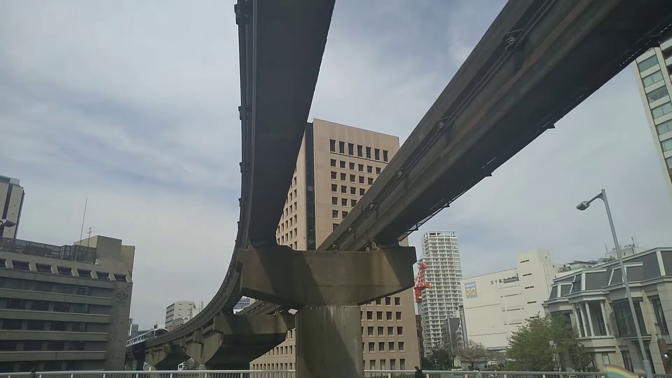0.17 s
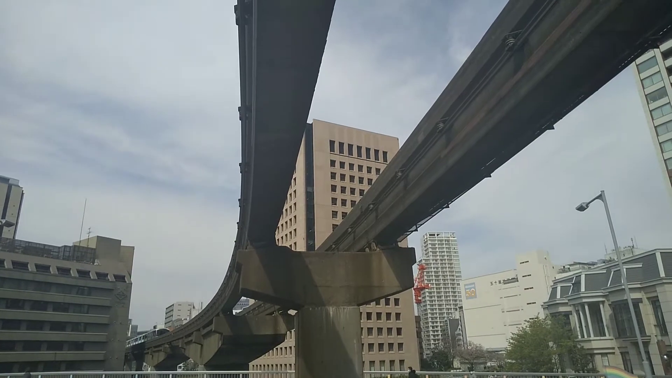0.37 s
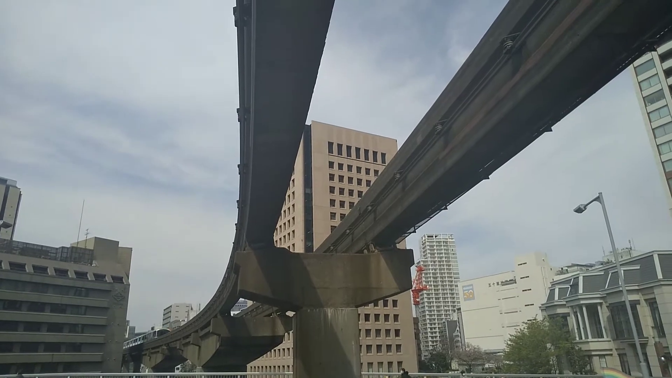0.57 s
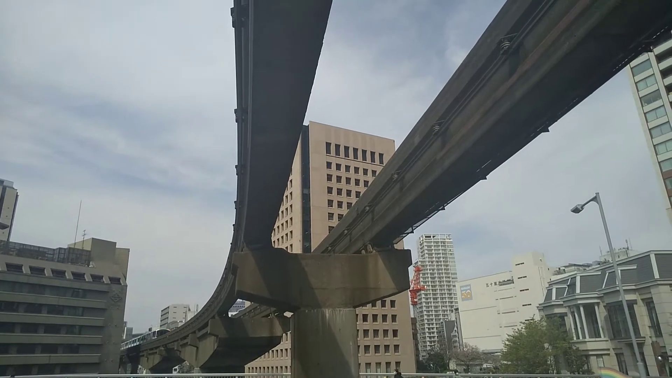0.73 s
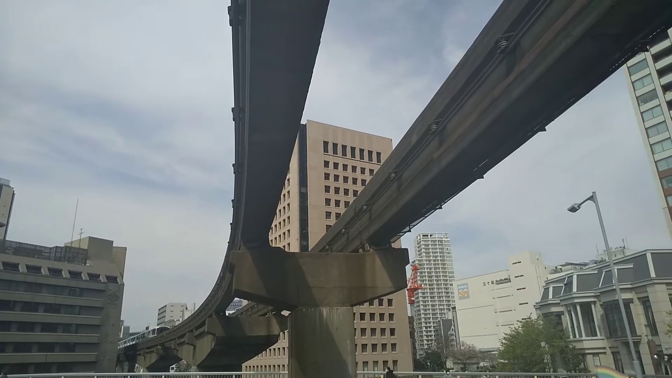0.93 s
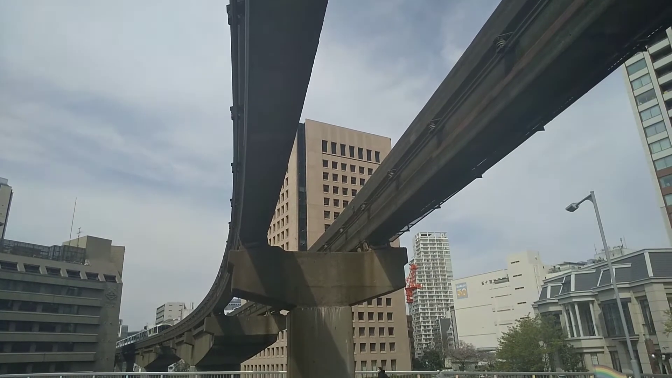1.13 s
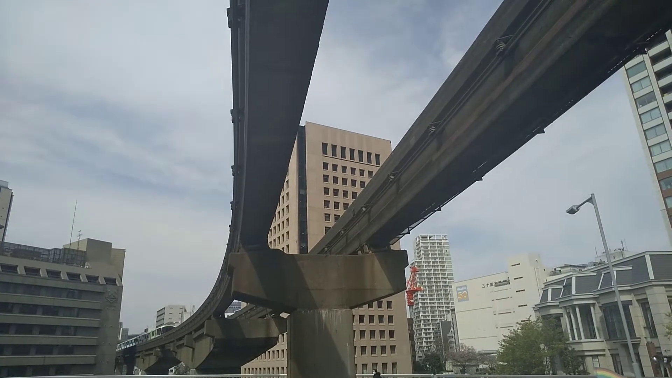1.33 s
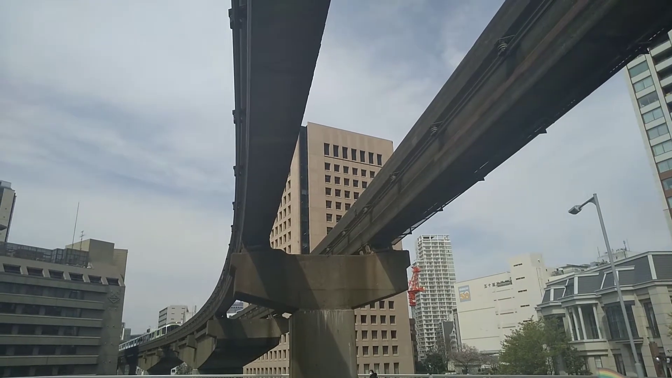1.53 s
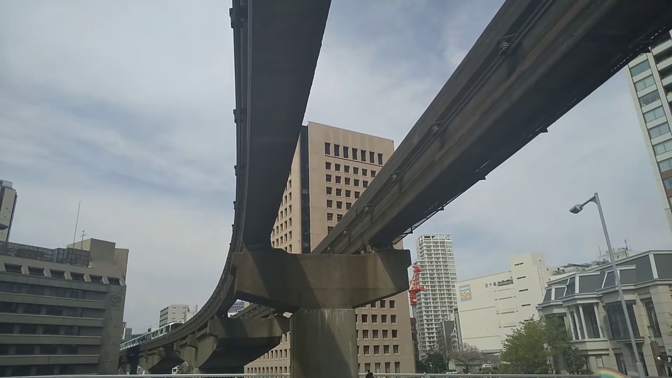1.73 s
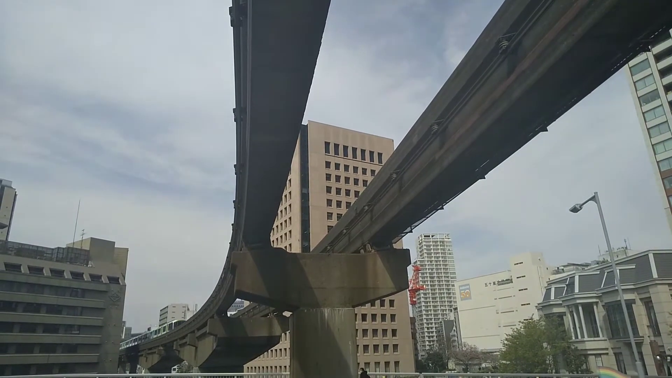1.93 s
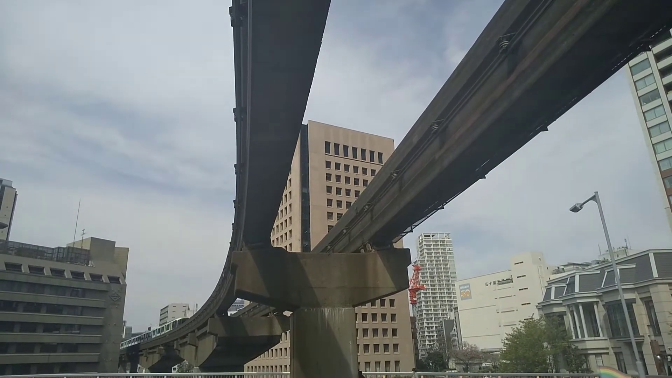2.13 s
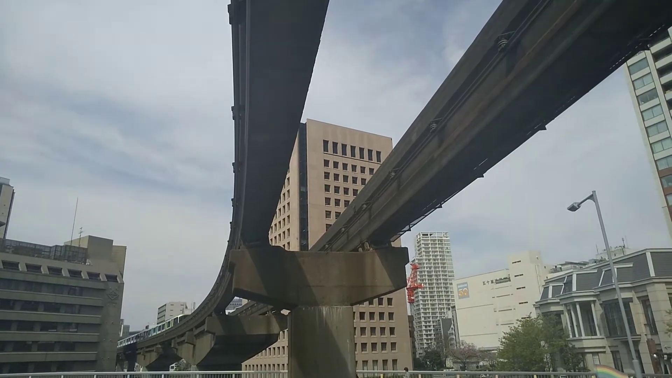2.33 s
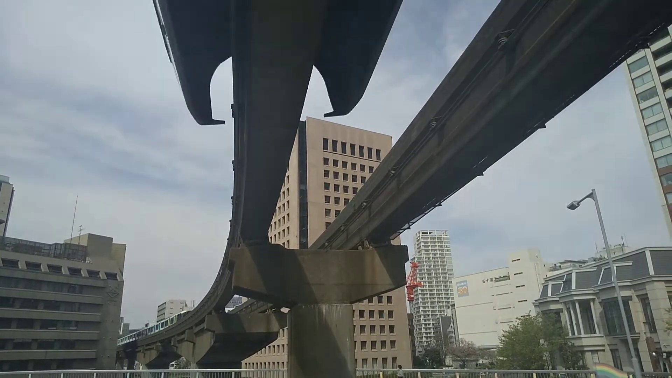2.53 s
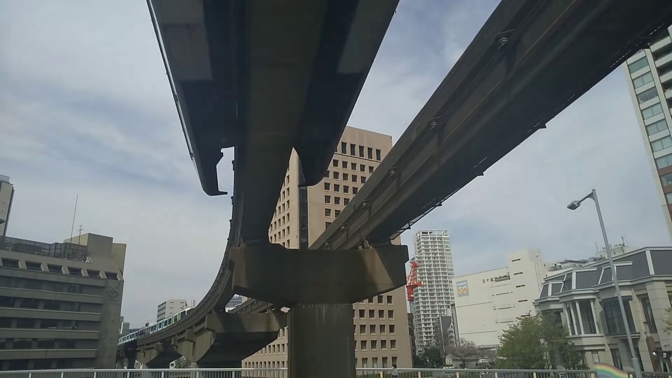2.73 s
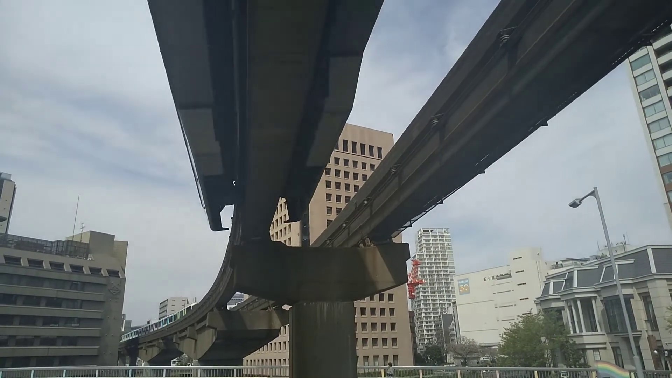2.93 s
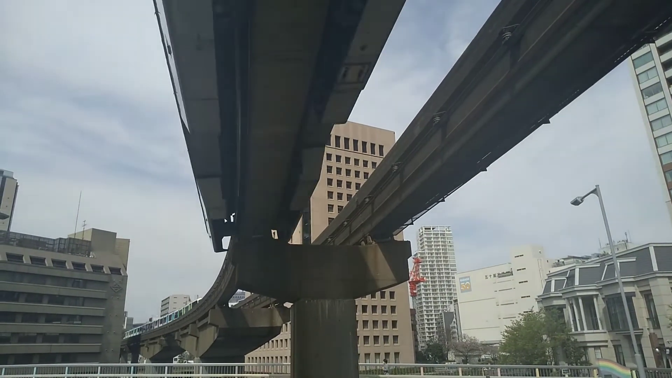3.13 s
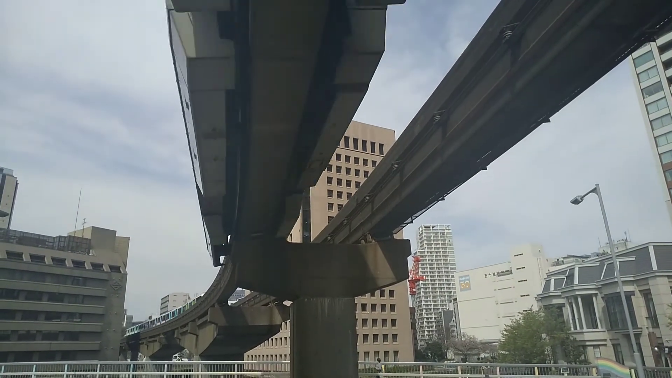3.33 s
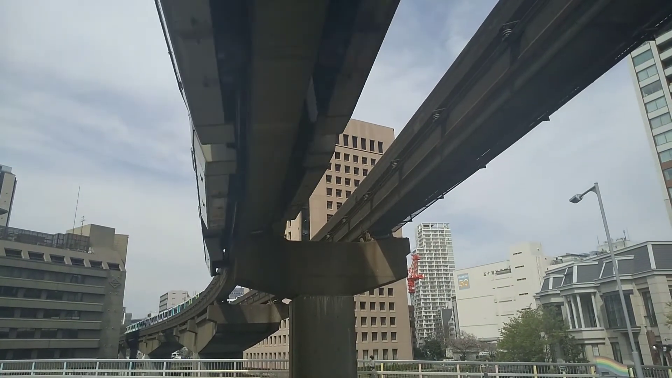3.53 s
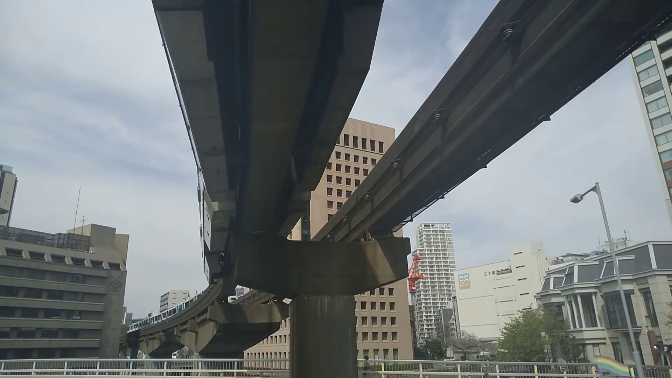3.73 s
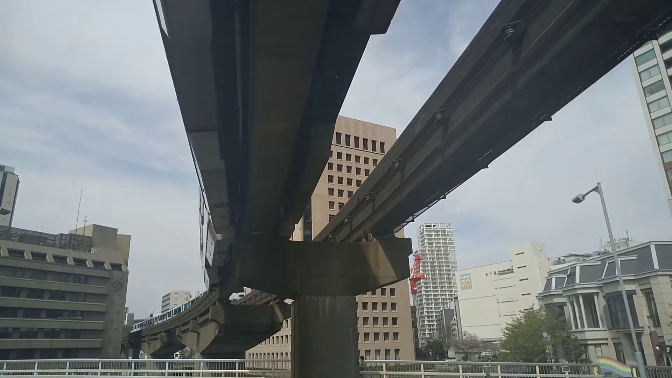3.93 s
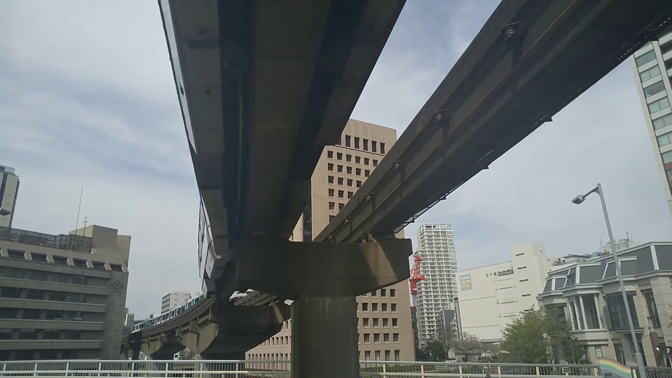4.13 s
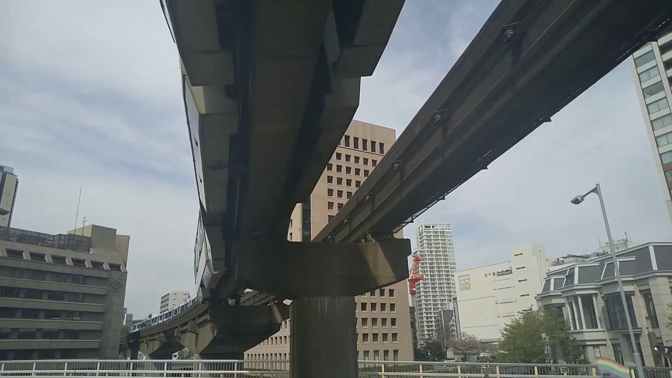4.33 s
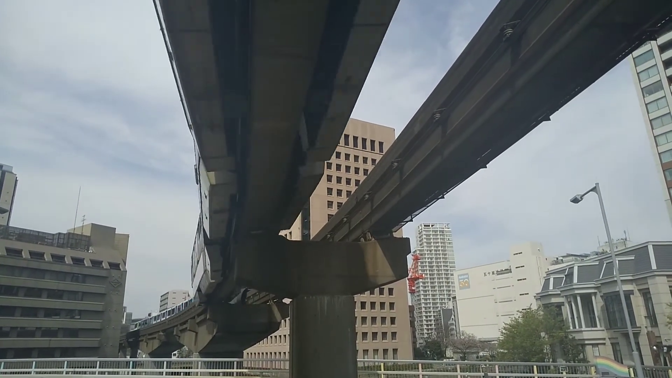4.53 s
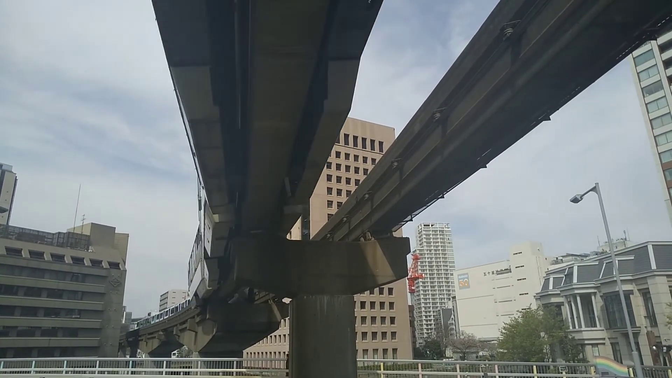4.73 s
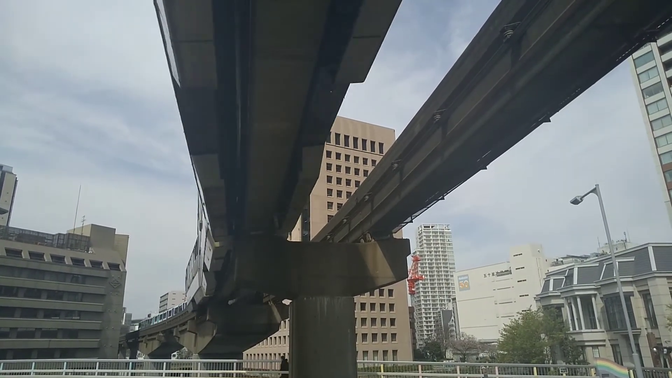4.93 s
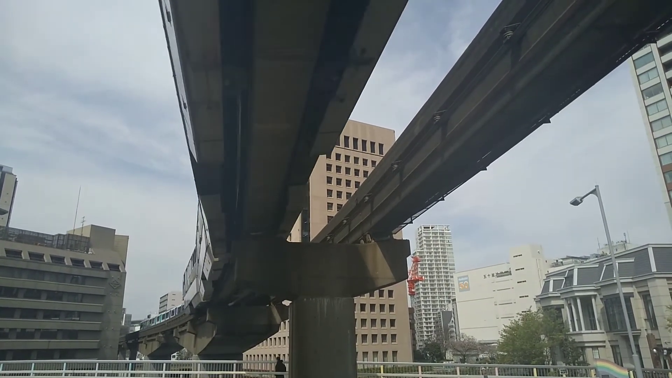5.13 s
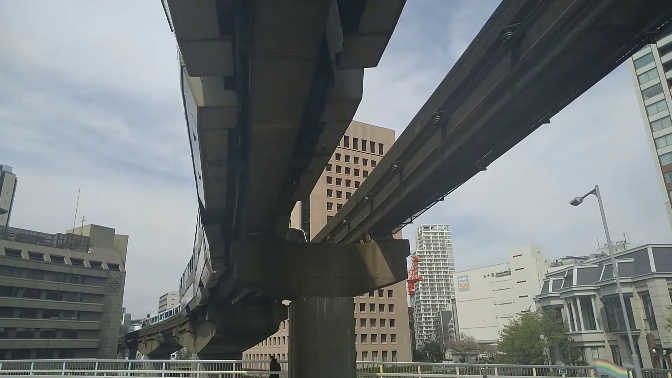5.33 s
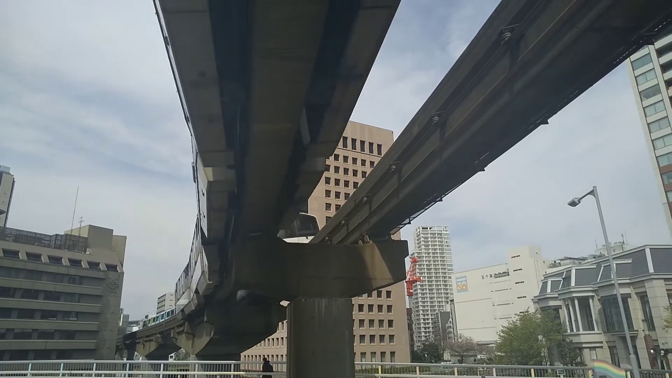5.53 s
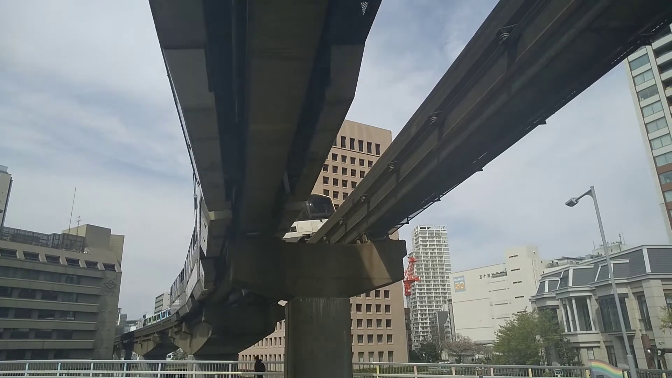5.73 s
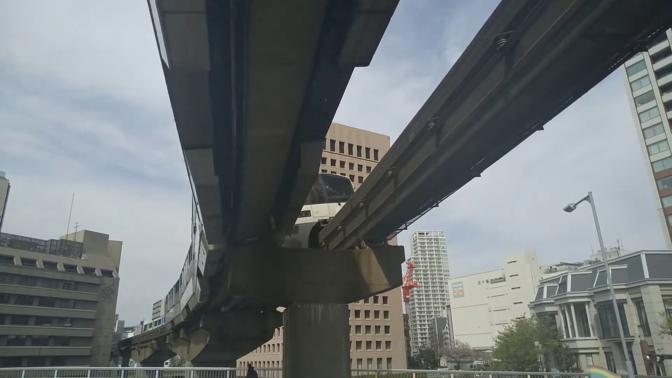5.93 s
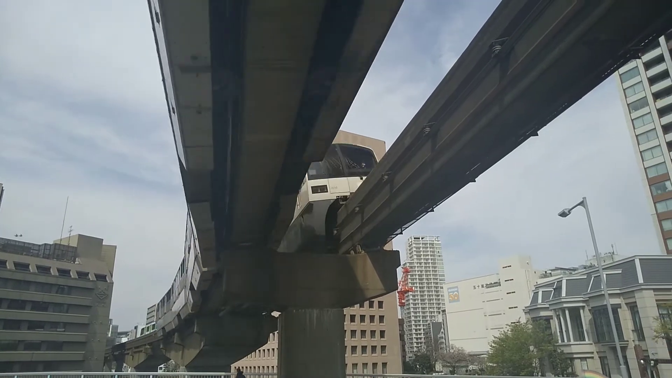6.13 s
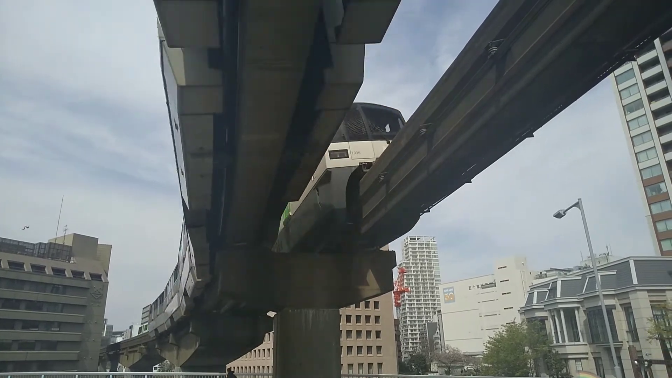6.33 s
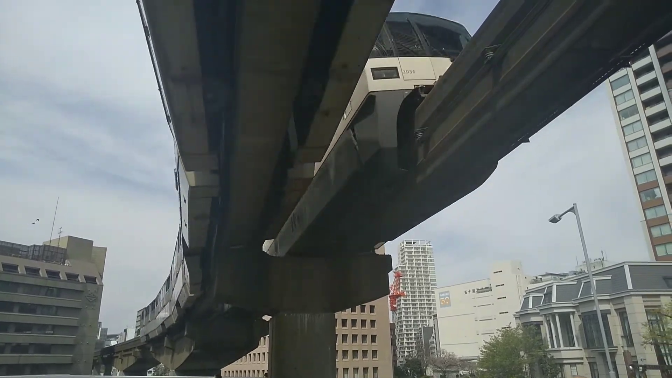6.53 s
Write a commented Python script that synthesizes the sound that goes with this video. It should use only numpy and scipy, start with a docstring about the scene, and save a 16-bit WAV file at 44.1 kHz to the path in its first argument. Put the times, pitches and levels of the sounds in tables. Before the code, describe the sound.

A monorail train passes overhead, heard in mono from a city street about eight metres below its concrete beam, with a faint, even wash of distant traffic. For the first two seconds it approaches: a low hum and tyre rush grow, with soft booms about every half second. At about 2 seconds a deep thud and a sharp slap mark the wheels reaching the span above, and the sound turns loud. Around 2.5 seconds the power contacts add a high, scraping, slightly ringing hiss, with one tiny, thin whistle. From 3 seconds the rubber tyres roar fully over a throbbing drone, and the beam booms with each wheel set, roughly twice a second. Quick, irregular double clacks over joints are thickest between 3 and 4.5 seconds. Rumble, clacks and surging hiss continue until the end, near 6.7 seconds, with the train still overhead.

```python
"""Monorail overhead, from the street

One microphone on a city road, about 8 m below a concrete beam, with distant traffic behind.
A rubber-tyred train nears and passes above: its tyres roar, slap over joints and set the beam
booming at its low modes, swelling with each set of wheels. Once the cars are overhead,
the current shoes hiss along the power rail."""
import sys
import numpy as np
from scipy import signal
from scipy.fft import rfft, irfft
from scipy.io import wavfile
from scipy.ndimage import uniform_filter1d, minimum_filter1d

SR = 44100
rng = np.random.default_rng(int(sys.argv[2]) if len(sys.argv) > 2 else 0)


def store_wav(level_fs):
    """Save 16-bit WAV to argv[1]."""
    pcm = np.round(np.clip(np.atleast_2d(level_fs), -1, 1) * 32767)
    wavfile.write(sys.argv[1], SR, pcm.T.astype(np.int16))


N = 295029
TIME = np.arange(N) / SR
ARRIVAL_S, SPEED_M_PER_S, HEIGHT_M = 2.154, 17.7, 7.9  # the nose comes over the microphone
SPAN_S, CROSSING_S = 1.96, 0.018  # the leading wheels cross onto the span overhead
SHOES_SEEN_S, UNCOVER_S = 2.355, 0.14  # the shoes come out from behind the beam


def gain_of(db):
    """Decibels to amplitude."""
    return 10 ** (np.asarray(db) / 20)


def unit_rms(x):
    """Scales to rms 1."""
    return x / np.sqrt(np.mean(x ** 2) + 1e-20)


def add(mix, start_s, sound):
    """Mixes a sound in at start_s."""
    part = mix[round(start_s * SR):][:len(sound)]
    part += sound[:len(part)]


def before(end_s, fade_s):
    """Fades smoothly from 1 to 0 around end_s."""
    return .5 - .5 * np.tanh((TIME - end_s) / fade_s)


def bell(centre_s, half_length_s):
    """A bell-shaped rise and fall of height 1."""
    return np.exp(-((TIME - centre_s) / half_length_s) ** 2)


def swells(passes):
    """A swell in dB for each thing passing the microphone; one curve per dB column."""
    return sum(np.outer(dbs, bell(centre_s, half_s)) for centre_s, half_s, *dbs in passes)


def wander(rate_hz):
    """Random drift of rms 1, up to about rate_hz."""
    hz = np.fft.rfftfreq(N, 1 / SR)
    return unit_rms(irfft(rfft(rng.standard_normal(N)) / (1 + (hz / rate_hz) ** 4), N))


def ringing_noise(hz, width_hz):
    """Noise of rms 1, passed twice through a resonance at a steady or moving pitch."""
    carrier = np.exp(2j * np.pi * np.cumsum(hz * np.ones(N)) / SR)
    pole = np.exp(-np.pi * width_hz / SR)
    ring = rng.standard_normal(N)
    for _ in range(2):
        ring = (carrier * signal.lfilter([1 - pole], [1, -pole], ring / carrier)).real
    return unit_rms(ring)


def noise(spectrum, patchy_db):
    """Noise of rms 1 with a given spectrum, its level drifting in patches of time and frequency."""
    frames = signal.stft(rng.standard_normal(N), nperseg=512, noverlap=384)[2]
    patches = uniform_filter1d(rng.standard_normal(frames.shape), size=7, axis=0)
    patches = unit_rms(uniform_filter1d(patches, size=12, axis=1))
    patchy = signal.istft(frames * gain_of(patchy_db * patches), nperseg=512, noverlap=384)[1][:N]
    hz, db = np.transpose(spectrum)
    log_hz = np.log(np.fft.rfftfreq(N, 1 / SR) + 1)
    colour_db = np.interp(log_hz, np.log(hz), db, left=-90, right=-90)
    return unit_rms(irfft(rfft(patchy) * gain_of(colour_db), N))


def drone(hz, waver_hz, throb_db):
    """One tone of the beam, rms 1, kept going by the rolling wheels; its pitch and level waver."""
    turns = np.cumsum(hz + waver_hz * wander(rate_hz=12.2)) / SR
    throb = gain_of(throb_db * wander(rate_hz=8.2))
    return unit_rms(throb * np.sin(2 * np.pi * turns))


def nearness_db():
    """Spreading loss from the train's nose to the microphone; stays at 0 dB once cars are above."""
    ahead_m = SPEED_M_PER_S * np.maximum(ARRIVAL_S - TIME, 0)
    return 20 * np.log10(HEIGHT_M / np.hypot(HEIGHT_M, ahead_m))


def rolling_db(falloff, far_span_db):
    """Level of a rolling sound: grows with nearness, steps up as the wheels reach the span overhead."""
    return falloff * nearness_db() + far_span_db * before(SPAN_S, CROSSING_S)


def sliding_db(level_db, falloff, hidden_db=-7.5):
    """Level of a shoe sound: grows with nearness, opens up once the beam no longer hides the shoes."""
    return level_db + falloff * nearness_db() + hidden_db * before(SHOES_SEEN_S, UNCOVER_S)


# Spectrum of far-off traffic at street level: frequency_hz, density_db
TRAFFIC_SPECTRUM = [(15, -24), (28, -14), (50, 0.5), (85, 1.5), (160, -7.5), (240, -4.5), (420, -13.5),
                    (680, -6), (950, -15.5), (1550, -16.5), (2300, -21.5), (3200, -34.5), (5000, -51),
                    (14000, -65)]
def traffic(level_db=-28.5):
    """The even wash of the road, far from the microphone."""
    return gain_of(level_db) * noise(TRAFFIC_SPECTRUM, patchy_db=1)


# Spectra of the shoes on the power rail, lowest band to highest: frequency_hz, density_db
SCRAPE_SPECTRUM = [(2200, -29), (3100, -4), (3600, 4), (4200, -1.5), (5200, -3.5), (5800, -2.5), (6700, -6),
                   (7800, -18.5), (10000, -20)]
HISS_SPECTRUM = [(6000, -13), (7000, -3.5), (7800, -6), (8600, 0.5), (9400, 1.5), (10400, -1), (11500, -14),
                 (14000, -22)]
SIZZLE_SPECTRUM = [(8500, -16), (10300, -3.5), (11200, -1.5), (12500, 0.5), (14300, -3)]
# Swells as shoes sweep over the microphone: centre_s, half_length_s, ring_db, hiss_db, sizzle_db
SHOE_SWELLS = [(2.51, .09, 3, 7.5, 8), (2.92, .22, 1, 1.5, 6), (3.38, 0.2, 1, 4.5, 4.5),
               (4.12, .05, 2, 3, 8), (4.34, .1, 4.5, 3.5, 4.5), (4.62, 0.081, 4, 1, 0),
               (4.88, .16, 2, 2, 3), (5.31, 0.077, 3.5, 3.5, 3), (6.06, .12, 2, 1, 6),
               (6.38, .17, 4.5, 2, 10), (6.65, 0.057, 5.5, 2.5, 1)]
def shoes(ring_hz=4360, ring_flutter_db=1.1, chatter_db=1.0):
    """Sliding contact scrapes, hisses and rings the shoe holders, more so as more cars come above."""
    ring_swell, hiss_swell, sizzle_swell = swells(SHOE_SWELLS)
    nose_only = before(3.28, fade_s=0.21)
    scrape_db = sliding_db(-46, falloff=1.1, hidden_db=-5.5) + 0.73 * hiss_swell - 2 * nose_only
    ring_db = sliding_db(-47.5, falloff=1.5) + ring_swell - 7 * nose_only
    hiss_db = sliding_db(-53.5, falloff=1.36) + hiss_swell
    sizzle_db = sliding_db(-57.5, falloff=1.5) + sizzle_swell
    chatter = gain_of(chatter_db * wander(rate_hz=28))
    holders = ringing_noise(ring_hz + 70 * wander(rate_hz=18), width_hz=750)
    holders *= gain_of(ring_db + ring_flutter_db * wander(rate_hz=24))
    scrape = gain_of(scrape_db) * noise(SCRAPE_SPECTRUM, patchy_db=2.5)
    hiss = gain_of(hiss_db) * noise(HISS_SPECTRUM, patchy_db=1.5)
    sizzle = gain_of(sizzle_db) * noise(SIZZLE_SPECTRUM, patchy_db=2.5)
    return chatter * (scrape + holders + hiss + sizzle)


def shoe_whistle(pitch_hz=10900, level_db=-52):
    """The leading shoe sings briefly as it sweeps overhead."""
    envelope = gain_of(level_db) * bell(centre_s=2.505, half_length_s=0.042)
    return envelope * ringing_noise(pitch_hz, width_hz=300)


# Bending modes of the concrete beam overhead: pitch_hz, width_hz, level_db
BEAM_MODES = [(57.76, 2.2, -6), (73.3, 10, -5), (94.9, 21, 4), (124, 12, -1.5), (139.2, 6.9, -4.5)]
# Path of the beam's upper tone, which drones on between booms: time_s, pitch_hz
UPPER_TONE_PITCH = [(1.9, 100), (2.33, 103.2), (3.51, 99.66), (3.85, 112.2), (4.06, 100.2), (4.23, 110.2),
                    (4.38, 100.5), (4.74, 110.5), (6.69, 109)]
def beam(rumble_db=-19.5, upper_db=-19, steadiness=0.45, hold_s=0.073):
    """A tone over the looser rumble of the beam's modes, loud once the span carries the train."""
    rumble = sum(gain_of(db) * ringing_noise(hz, 2 * width_hz) for hz, width_hz, db in BEAM_MODES)
    power = uniform_filter1d(rumble ** 2, int(hold_s * SR))
    rumble = unit_rms(rumble / (power + 1e-12) ** (steadiness / 2))  # the cars' weight keeps it going
    time_s, pitch_hz = np.transpose(UPPER_TONE_PITCH)
    upper = drone(np.interp(TIME, time_s, pitch_hz), waver_hz=1.5, throb_db=2.0)
    *_, beam_swell = swells(WHEEL_SWELLS)
    load_db = rolling_db(falloff=0.39, far_span_db=-9.5) + beam_swell
    return gain_of(load_db) * (gain_of(upper_db) * upper + gain_of(rumble_db) * rumble)


# Booms heard from below as each bogie loads a span: centre_s, half_length_s, level_db, pitch_hz
BOGIE_BOOMS = [(0.07, .08, -24, 86), (0.48, 0.066, -24.5, 84.7), (0.99, 0.1, -24, 94.2),
               (1.504, 0.036, -18.5, 88.8), (2.069, 0.067, -12.5, 92.74), (2.214, .05, -16, 91.93),
               (2.66, 0.18, -14.5, 90.25), (3.054, 0.13, -14.5, 84.84), (3.652, 0.091, -10.5, 89.3),
               (4.0, 0.098, -11.5, 87.3), (4.458, .07, -12.5, 94.5), (4.692, 0.1293, -14.5, 94.1),
               (5.089, .13, -15, 85), (5.492, 0.15, -12.5, 91.1), (5.96, .17, -13, 89.5),
               (6.554, .14, -13.5, 88.2)]
def booms(boom_db=-1.7, hum_db=-27):
    """The beam's lower tone hums under the train and swells with each bogie, beating with the upper."""
    envelopes = np.array([gain_of(db) * bell(s, half_s) for s, half_s, db, _ in BOGIE_BOOMS]) + 1e-12
    swell = envelopes.sum(0)
    pitch_hz = np.array(BOGIE_BOOMS)[:, 3] @ envelopes / swell  # leans to the loudest boom
    hum = gain_of(hum_db + rolling_db(falloff=0.3, far_span_db=-9))
    return (hum + gain_of(boom_db) * swell) * drone(pitch_hz, waver_hz=1.41, throb_db=0.6)


def span_thud(start_s=1.972, pitch_hz=94, gain_db=-7, rise_s=0.0067, decay_s=0.037):
    """The leading bogie lands on the span overhead and kicks it into booming."""
    t = np.maximum(TIME - start_s, 0)
    envelope = (1 - np.exp(-t / rise_s)) * np.exp(-t / decay_s)
    return gain_of(gain_db) * envelope * np.sin(2 * np.pi * pitch_hz * t)


def slap(ring_hz, width_hz=290, rise_s=0.0015, decay_s=0.0076, lag_s=0.01242,
         tail_db=-18, tail_s=0.014, thump_db=-11, thump_edge_hz=1500):
    """Two tyres clack over a joint just after each other; the sound dies away between the beams."""
    t = np.arange(SR // 4) / SR
    hz = np.fft.fftfreq(len(t), 1 / SR)
    blow = (1 - np.exp(-t / rise_s)) * (np.exp(-t / decay_s) + gain_of(tail_db) * np.exp(-t / tail_s))
    pair = blow + 0.63 * np.interp(t - lag_s, t, blow, left=0)
    ring_band = np.exp(-.5 * ((hz - ring_hz) / width_hz) ** 2)
    thump_band = (hz > 0) * gain_of(thump_db) / (1 + abs(hz / thump_edge_hz) ** 6)
    clack = np.fft.ifft(np.fft.fft(rng.standard_normal(len(t))) * (ring_band + thump_band))
    steadied = clack.real / np.sqrt(abs(clack) + 1e-12)  # partly flattens the noise's own envelope
    return unit_rms(steadied) * pair / pair.max()


# Tyres striking joints and rough spots above the microphone: time_s, level_db, ring_hz
JOINT_SLAPS = [(1.96, -5, 1440), (2.035, -18, 1370), (2.107, -11, 1210), (2.518, -8, 1273),
               (2.862, -14, 1517), (3.149, -15, 1450), (3.24, -12.5, 1440), (3.297, -11, 1222),
               (3.358, -16, 1503), (3.429, -9.5, 1300), (3.512, -12, 1170), (3.802, -8.5, 1314),
               (3.876, -13, 1493), (3.994, -19, 1264), (4.08, -13, 1300), (4.158, -8, 1266),
               (4.241, -8.5, 1510), (4.385, -8.5, 1369), (4.755, -9, 1379), (5.052, -13.5, 1250),
               (5.21, -12, 1533), (5.57, -14, 1537), (5.754, -11, 1440), (6.052, -14, 1406),
               (6.135, -15, 1373), (6.223, -10.5, 1419), (6.41, -11, 1412)]
def joints(loud_db=-7, lead_s=0.002006, patter_db=-27, spread_db=5, patter_count=90):
    """The loud slaps, and a patter of small ones that grows with the rush of the treads."""
    slaps = np.zeros(N)
    for time_s, level_db, ring_hz in JOINT_SLAPS:
        add(slaps, time_s - lead_s, gain_of(level_db + loud_db) * slap(ring_hz))
    _, _, tread_swell, _ = swells(WHEEL_SWELLS)
    rush_db = rolling_db(falloff=1.1, far_span_db=-8) + tread_swell
    for position, size, ring_hz in rng.uniform([0, -1, 1100], [1, 1, 1650], (patter_count, 3)):
        at = int(position * N)
        add(slaps, at / SR, gain_of(rush_db[at] + patter_db + spread_db * size) * slap(ring_hz))
    return slaps


# Spectra of rubber tyres on concrete, from under the beam: frequency_hz, density_db
CASING_SPECTRUM = [(15, -27), (30, -36), (45, -9), (70, -9), (140, 0.5), (185, 2.5), (215, 6), (250, 5.5),
                   (300, -7), (400, -7), (700, -35)]
ROAR_SPECTRUM = [(150, -5), (300, 1), (390, -5), (470, -2), (560, -2.5), (670, 0), (850, -4), (1050, -7),
                 (1400, -19), (2500, -19.5)]
TREAD_SPECTRUM = [(600, -19), (950, -7.5), (1250, -.5), (1550, -3), (1850, -7), (2200, -12), (2550, -14),
                  (3000, -21.5), (4000, -30), (6000, -48)]
# Swells as wheel sets roll past: centre_s, half_length_s, roar_db, casing_db, tread_db, beam_db
WHEEL_SWELLS = [(0.55, .1, 1.5, 1.5, 1, 0), (0.97, 0.13, 2.5, 2, 4.5, 4.5), (1.48, .1, 1, 4.5, 1, 0),
                (1.98, .07, 0, 5.5, 1, -0.5), (2.33, 0.11, 1.5, 0, -1, 2.5), (2.55, 0.078, 1.5, 1, 3, 1.5),
                (3.34, 0.17, 4, 5, 2.5, -2), (3.82, 0.087, 3, 1.5, 3, 0), (4.28, 0.17, 3.5, 5.5, 2, -2),
                (4.8, 0.11, 3, 0.5, 2, 0.5), (5.2, 0.17, 2.5, 0, 1.5, -1), (5.58, 0.082, -1, -3.5, 0, 2.5),
                (5.79, 0.057, 2, 4, 3, -4), (6.12, .1, 2, 2.5, -0.5, -2), (6.42, 0.16, 1, 2.5, 3.5, -0.5)]
def tyres(roar_db=-21, casing_db=-23, tread_db=-26, bumps_db=0.7, flutter_db=1.55):
    """Tyres roar, their casings drum and their treads rush; bumps in the concrete make them flutter."""
    roar_swell, casing_swell, tread_swell, _ = swells(WHEEL_SWELLS)
    nose_only = before(2.9, fade_s=0.2)  # only the first car's tyres are near yet
    roar_pass_db = rolling_db(falloff=0.91, far_span_db=-2) + roar_swell
    casing_pass_db = rolling_db(falloff=0.93, far_span_db=0) + casing_swell - 2.5 * nose_only
    tread_pass_db = rolling_db(falloff=0.99, far_span_db=-2) + tread_swell - 1.5 * nose_only
    nearness = gain_of(nearness_db())  # far off, the flutter of many wheels evens out
    bumps = bumps_db * wander(rate_hz=39) * nearness
    flutter = flutter_db * wander(rate_hz=20) * nearness
    drum = gain_of(casing_db + casing_pass_db + bumps) * noise(CASING_SPECTRUM, patchy_db=0.2)
    roar = gain_of(roar_db + roar_pass_db + bumps) * noise(ROAR_SPECTRUM, patchy_db=0.5)
    rush = gain_of(tread_db + tread_pass_db + flutter) * noise(TREAD_SPECTRUM, patchy_db=1.0)
    return drum + roar + rush


def scene():
    """The train above and the traffic beyond, in mono from the street."""
    train = beam() + booms() + tyres() + joints() + span_thud() + shoes() + shoe_whistle()
    return (train + traffic())[None]


def record(dry, ceiling_db=-2.7, recovery_db_per_s=120, cutoff_hz=14300):
    """The microphone feeds a fast limiter that holds the peaks down, then a steep low-pass."""
    over_db = np.maximum(20 * np.log10(abs(dry[0]) + 1e-9) - ceiling_db, 0)
    recovery_db = TIME * recovery_db_per_s
    held_db = np.maximum.accumulate(over_db + recovery_db) - recovery_db
    duck_db = uniform_filter1d(minimum_filter1d(-held_db, size=64), size=64)
    low_pass = signal.ellip(12, .05, 60, cutoff_hz, fs=SR, output="sos")
    return signal.sosfiltfilt(low_pass, dry * gain_of(duck_db))


dry = scene()
out = record(dry)
store_wav(out)
```